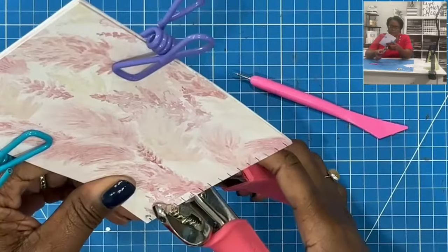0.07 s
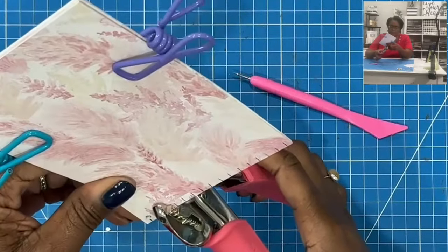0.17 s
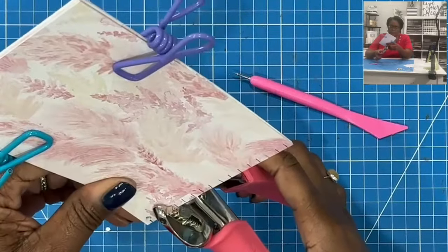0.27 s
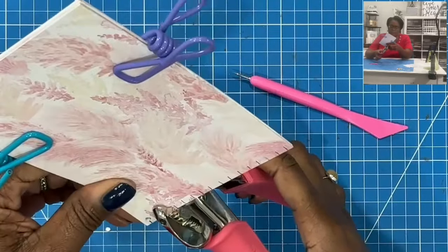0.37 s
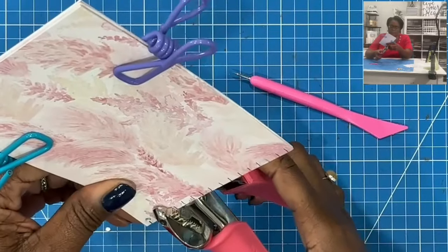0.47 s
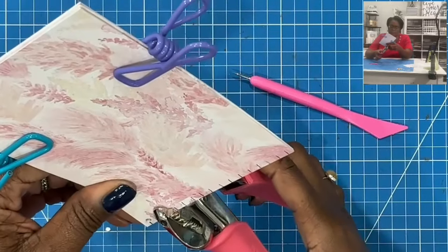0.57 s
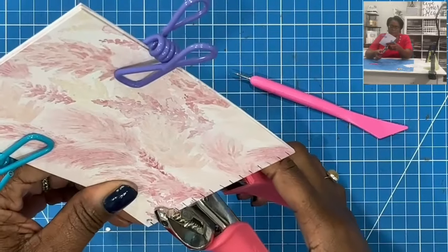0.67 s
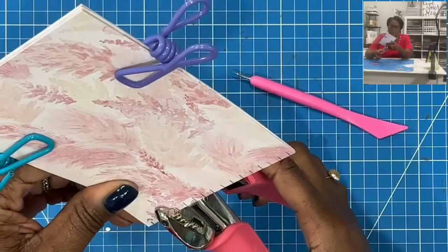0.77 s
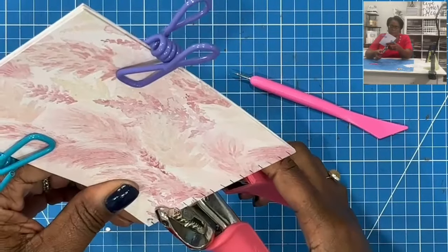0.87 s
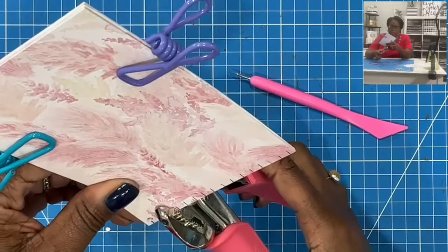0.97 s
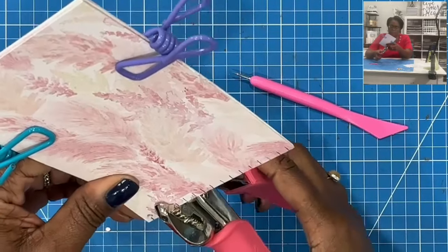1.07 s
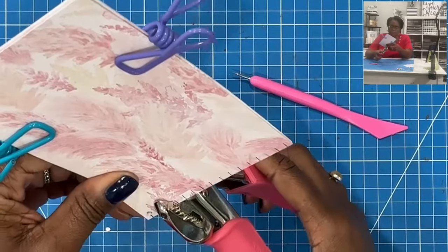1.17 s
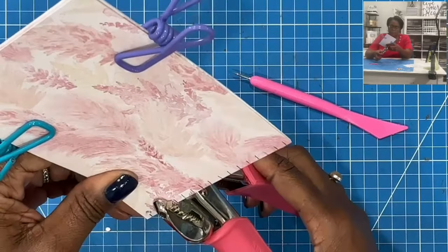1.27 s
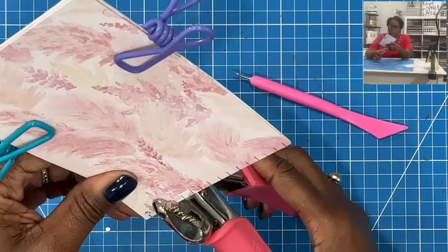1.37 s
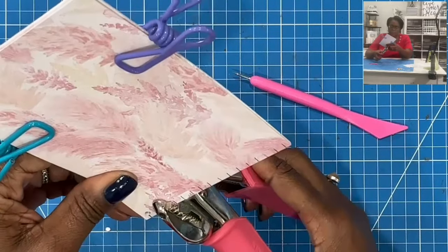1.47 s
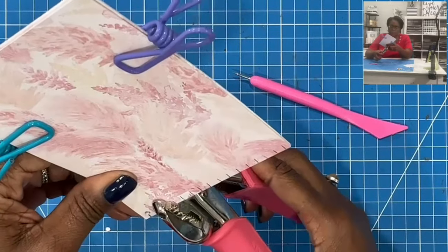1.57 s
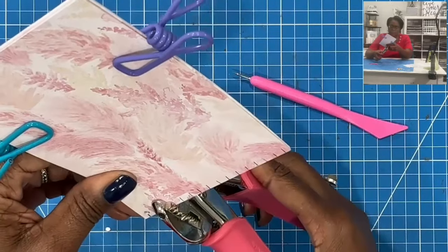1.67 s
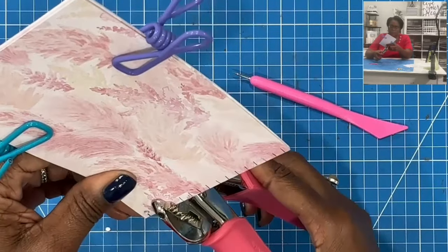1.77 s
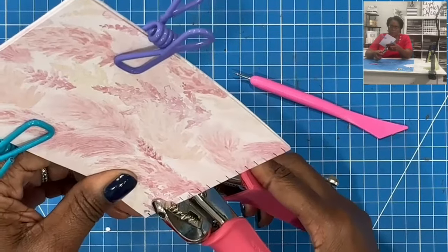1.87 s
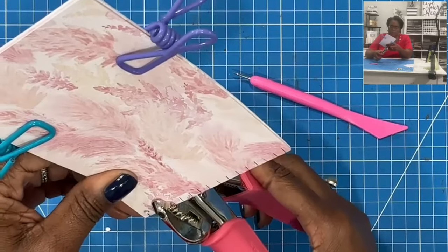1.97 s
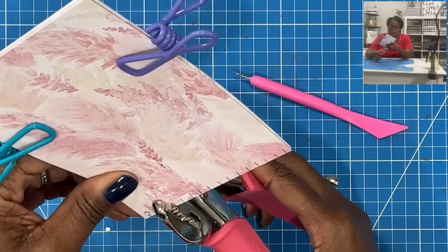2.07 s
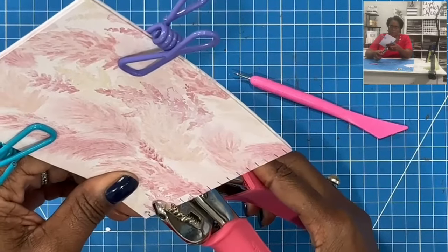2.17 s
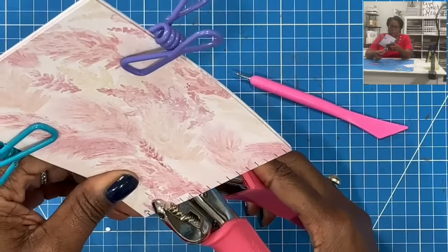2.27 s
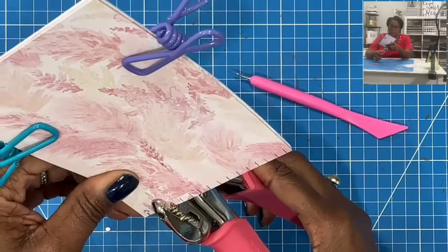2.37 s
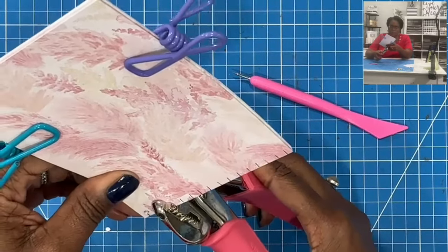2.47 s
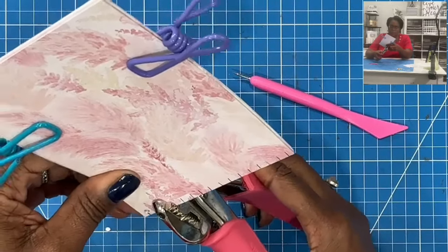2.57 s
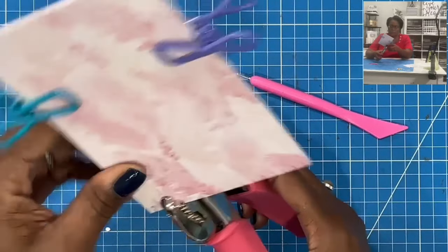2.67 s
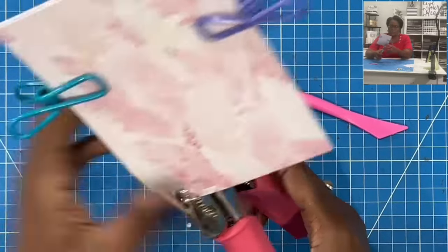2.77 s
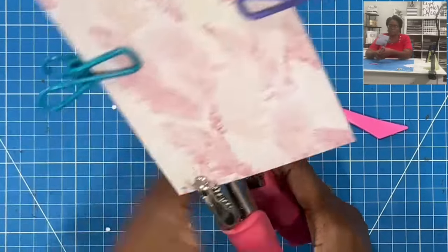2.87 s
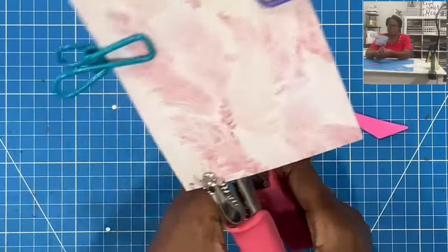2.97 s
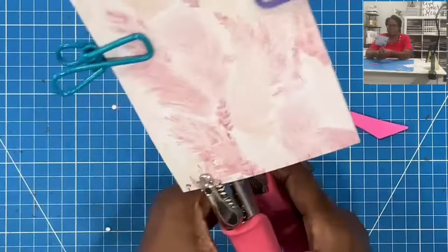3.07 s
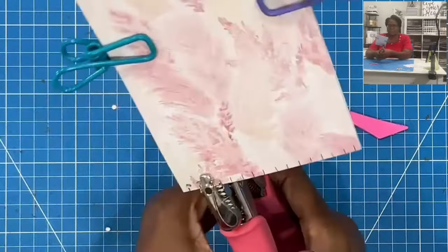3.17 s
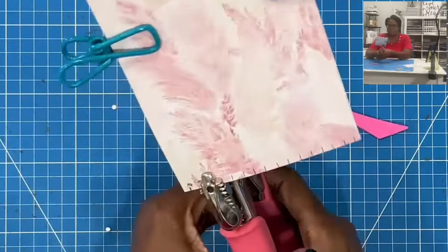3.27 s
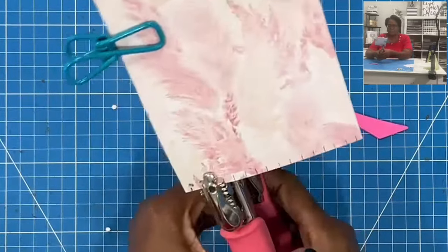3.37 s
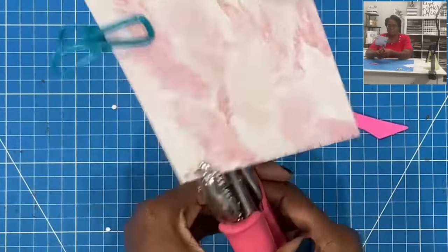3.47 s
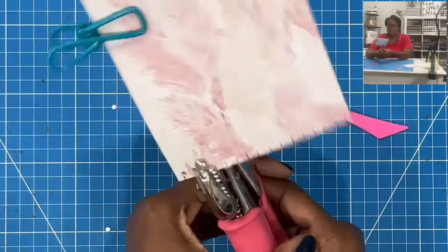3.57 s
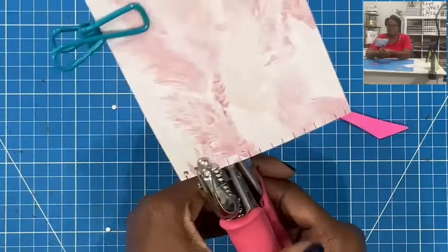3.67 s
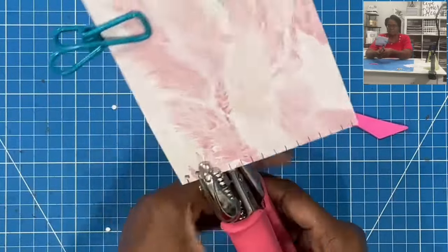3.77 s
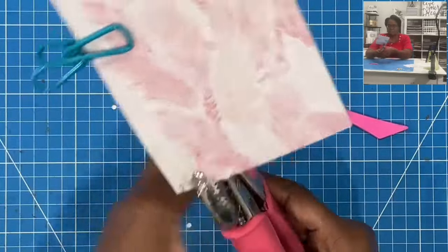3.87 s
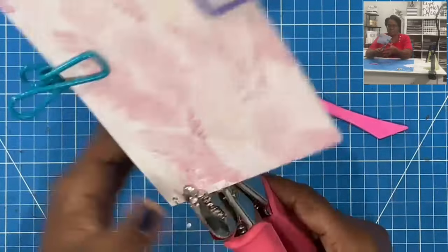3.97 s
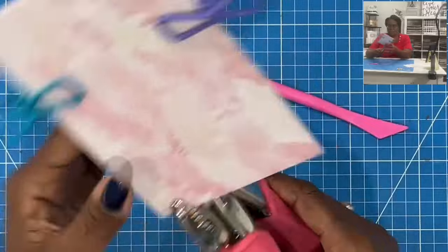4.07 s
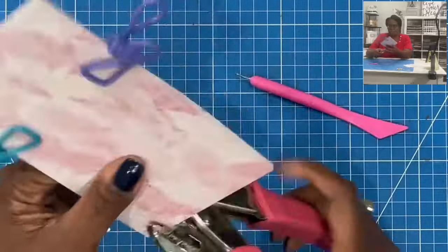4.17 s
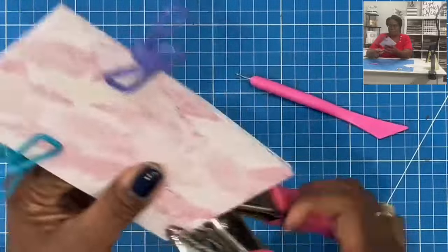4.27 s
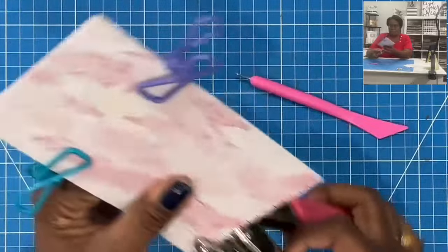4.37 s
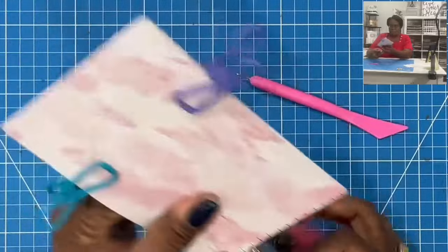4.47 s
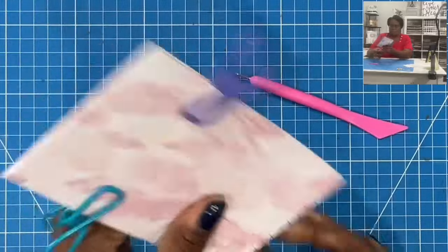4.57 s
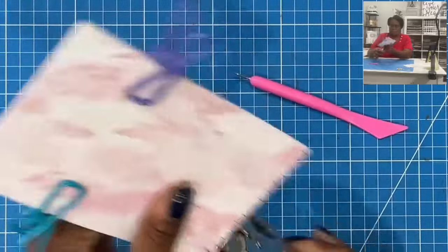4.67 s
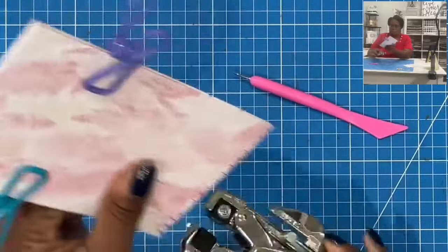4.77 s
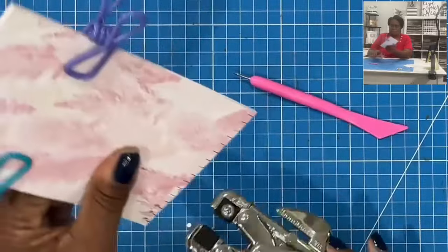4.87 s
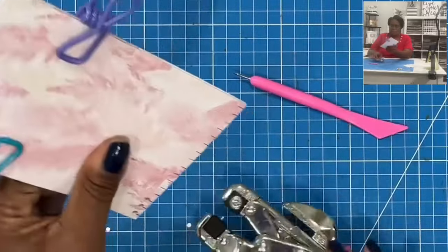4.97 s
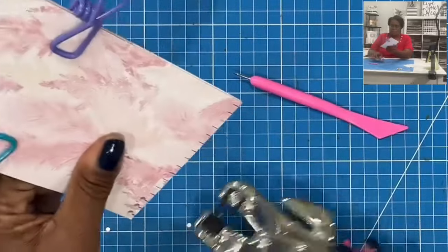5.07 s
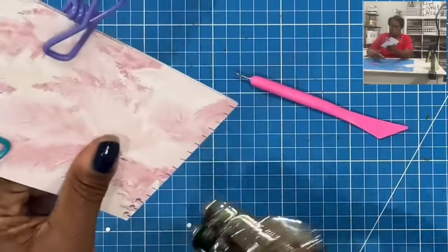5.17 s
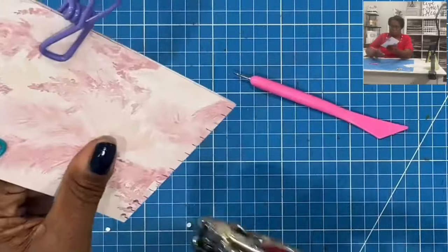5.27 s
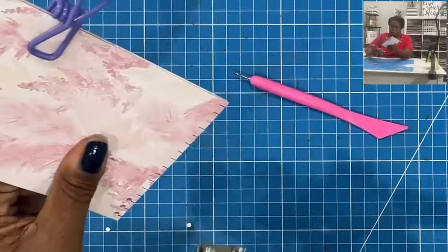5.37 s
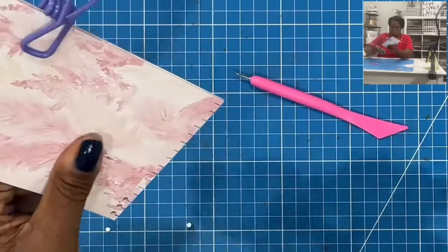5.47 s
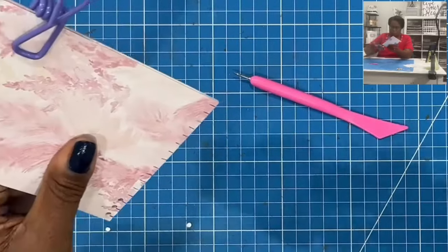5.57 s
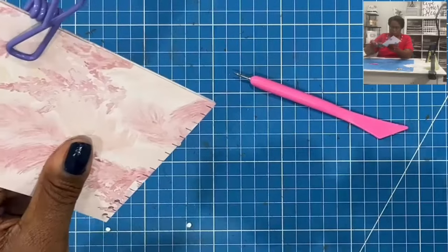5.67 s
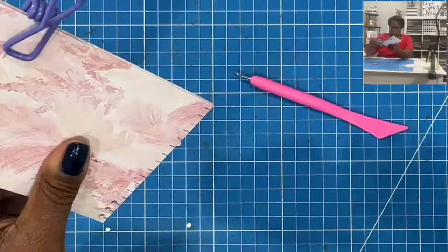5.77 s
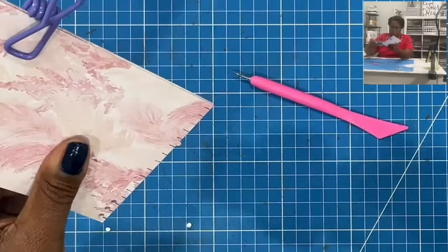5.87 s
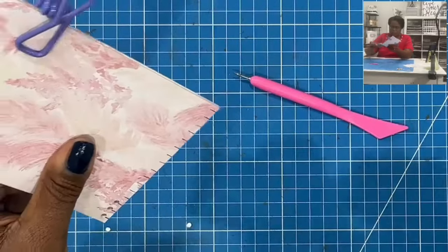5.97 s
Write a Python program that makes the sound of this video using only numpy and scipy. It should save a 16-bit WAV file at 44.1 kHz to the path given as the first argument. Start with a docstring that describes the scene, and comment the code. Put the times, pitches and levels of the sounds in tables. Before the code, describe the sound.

A fan hums quietly in a small room, with a thin whine that comes and goes. Fingers tap faintly, then a steel hole punch snaps once, loudly, through a stack of paper and rings briefly. The pin rubs back out with a tiny squeak and the paper rustles free. Finally the punch is laid on the table with light knocks, rattling parts and a small clink, all heard close up.

```python
"""A fan hums quietly in a small room, its thin whine coming and going. Fingers tap and tighten
on a steel hole punch, which snaps through a stack of paper and sets its frame ringing.
The pin rubs back out with a tiny squeak, and the paper slides free. Last, the punch is laid
on the table: it knocks, its loose parts rattle and a small lever clinks."""
import sys
import numpy as np
from scipy import signal
from scipy.fft import rfft, irfft
from scipy.io import wavfile

SR = 44100
rng = np.random.default_rng(int(sys.argv[2]) if len(sys.argv) > 2 else 0)


def output_pcm(signal):
    """Save a mono or channel-first signal as 16-bit PCM at the path in sys.argv[1].

    Samples are clipped to [-1, 1] before scaling.
    """
    pcm = np.clip(np.atleast_2d(signal).T, -1, 1) * 32767
    wavfile.write(sys.argv[1], SR, np.round(pcm).astype(np.int16))


N = 265658
TIME = np.arange(N) / SR

# Levels in the tables are relative. A ring time is how long a sound takes to fall by 60 dB.
# tone colour of the moving air: (frequency [Hz], level [dB])
AIR_COLOUR = [(25, -39), (40, -20.5), (57, 0.5), (105, -3), (150, -11), (200, -13), (270, -9), (450, -14.5),
              (800, -13.5), (1150, -17), (1600, -19), (2800, -25.5), (4200, -38.5), (7000, -38),
              (10200, -34.5), (15500, -42.5)]
# the fan's low notes: (frequency [Hz], level [dB], waver [Hz])
FAN_NOTES = [(101.8, -60, 5), (320.2, -56, 3)]
# the fan's speed wanders slowly: (time [s], pitch of its whine [Hz])
WHINE_PITCH = [(0, 1114), (.42, 1107), (1.25, 1079), (2.15, 1108), (2.65, 1114), (3.5, 1095), (4.27, 1109),
               (5.1, 1094), (6, 1110)]
# fingers shift on the paper and grips, and a hand touches the table (last row): (time [s], level [dB], dying
# time [s], upper edge [Hz])
FINGER_TAPS = [(1.199, -42, 0.014, 2600), (1.707, -54.5, 0.019, 5800), (4.039, -43, 0.027, 5550),
               (4.575, -36.5, 0.082, 298)]
# tone colour of a tap: (frequency [Hz], level [dB])
TAP_COLOUR = [(100, -11), (500, 11), (1000, -1), (1500, 6), (2100, 3), (2750, 1), (4200, -5), (5400, -2),
              (6500, -7), (11000, -7), (16000, -25)]
# notes of the grip: (frequency [Hz], level [dB], ring time [s])
GRIP_NOTES = [(2600, 0, .02), (2950, -2, .015), (3550, -6, .015)]
# paper slides over fingers and steel: (time of peak [s], level [dB], length [s])
PAPER_STROKES = [(2.71, -67, .45), (3.85, -63, .22), (4.29, -54, 0.62), (4.465, -53, 0.44),
                 (4.619, -54, 0.58), (5.25, -59, .18), (5.425, -59, .3)]
# tone colour of sliding paper: (frequency [Hz], level [dB])
RUSTLE_COLOUR = [(300, -9), (2000, 0.5), (4000, -4.5), (6500, -8), (8000, -9), (9500, -3.5), (11500, -6.5),
                 (13000, -19), (16000, -18.5)]
# the stack gives way in steps: (time [s], crack [dB], stack thump [dB], handle clack [dB])
SNAP_STEPS = [(3.5145, -15, -30.5, -14.5), (3.519, -17, -22.5, -18), (3.5235, -9, -21, -24),
              (3.529, -6.5, -13, -22.5), (3.5344, -6.5, -28, -24)]
# tone colour of a crack: (frequency [Hz], level [dB])
CRACK_COLOUR = [(100, -48), (250, -5.5), (420, -7), (650, -2), (830, -5), (1050, 0.5), (1800, 2), (2700, 1),
                (4500, 0.5), (6500, -4), (8200, -3), (10000, 4), (13000, -1.5), (14200, -6.5), (16000, -6)]
# notes of the flexing paper and hand: (frequency [Hz], level [dB], ring time [s])
STACK_NOTES = [(264.8, -1.5, 0.13), (312, -1, .05), (351, -2, 0.079), (531, -6, 0.057), (680, -9, .03)]
# notes of the handles: (frequency [Hz], level [dB], ring time [s])
HANDLE_NOTES = [(1052, 5.5, 0.089), (1101, -0.5, .05), (1325, 2.5, 0.046), (1433, -3, 0.04),
                (2386, -2.5, .04), (2700, 2, 0.046), (2860, -9, .04)]
# notes of the steel frame: (frequency [Hz], level [dB], ring time [s])
FRAME_NOTES = [(1035, -2, .22), (1088, -4, .22), (1307, 1, .24), (1374, -2, .22), (2083, -4, .24),
               (2275, 0, .22), (2638, 2, .24), (3305, -2, .22), (3371, 1, .22), (3584, -1, .22),
               (4196, -3, .24), (4962, -4, .24), (5191, -3, .22), (5840, -4, .2), (7028, -6, .2),
               (7361, -2, .2), (8630, -6, .2), (9038, -1, .2), (9714, -2, .18), (9870, 0, .18),
               (10315, -2, .2), (10492, -2, .2), (11000, -4, .18), (12800, -4, .18)]
# tone colour of the rubbing pin: (frequency [Hz], level [dB])
SCRAPE_COLOUR = [(200, -6), (1200, -1), (2500, -6), (3700, 1.5), (6000, -2.5), (8000, 0), (10500, 3),
                 (13000, -3.5), (15800, -5)]
# the punch lands on one edge and rocks onto another: (time [s], gap [s], first knock [dB],
# second knock [dB], first pitch [factor], second pitch [factor], rattle [dB], rattle's upper edge [Hz])
PUNCH_LANDINGS = [(5.456, .025, -30.5, -44.5, 0.98, .6, -45, 11000),
                  (5.552, .016, -43, -35, 1.1, 1.15, -34, 6200),
                  (5.7758, .008, -34, -38, 1.02, 1.28, -36.5, 7600),
                  (5.812, .02, -39, -49, 1.04, 1.2, -38, 14000),
                  (5.8748, .0074, -33.5, -36, 1.02, 1.2, -31, 13600),
                  (6.0155, .012, -36, -42, 1.11, 1.1, -39, 6500)]
# notes of a knock on the table, at pitch factor 1: (frequency [Hz], level [dB], ring time [s])
TABLE_NOTES = [(590, -11, 0.039), (1074, 6, 0.063), (1213, 5.5, 0.036), (1395, 1, 0.026), (1770, -6, 0.014),
               (2660, -5, 0.045), (3310, -19, 0.031), (4200, -14, 0.046)]
# tone colour of loose steel parts: (frequency [Hz], level [dB])
RATTLE_COLOUR = [(200, -15), (1200, -5), (3000, -5.5), (4200, -14), (5300, -4), (6500, -6), (7600, -5.5),
                 (10000, 0.5), (13000, -6), (15500, -6.5)]
# a small steel lever drops and bounces: (time [s], level [dB])
LEVER_BOUNCES = [(5.611, -46), (5.617, -37), (5.641, -39.5), (5.657, -46)]
# notes of the lever: (frequency [Hz], level [dB], ring time [s])
LEVER_NOTES = [(5600, -1, .16), (5740, -10, .14), (7700, -13, .12), (9184, -8, .14), (9502, -3, .12),
               (10680, -8, .12), (15060, 3, .15), (15170, 1, .12)]
# loose parts fall into place: (time [s], level [dB])
SETTLING_PARTS = [(5.686, -39), (5.803, -36), (5.918, -35.5), (5.952, -39.5)]
# echoes off the near walls: (frequency [Hz], level [dB])
WALL_COLOUR = [(200, -7), (600, -4), (1200, -3), (2500, 1), (16000, -0.5)]
# how long the whole room echoes: (frequency [Hz], ring time [s])
ROOM_RING = [(150, 0.259), (500, 0.31), (1200, 0.3), (3000, 0.46), (3700, 0.48), (6000, 0.37),
             (10000, 0.31), (16000, 0.23)]


def amp(db):
    """Turns decibels into a gain."""
    return 10 ** (np.asarray(db) / 20)


def evened(x):
    """Scales a signal to an average strength (rms) of 1."""
    return x / np.sqrt(np.mean(x ** 2) + 1e-20)


def read(points, hz):
    """Looks up a frequency in a table, blending between rows on a log scale."""
    row_hz, value = np.transpose(points)
    return np.interp(np.log(hz + 1), np.log(row_hz + 1), value)


def drift(rate_hz):
    """A smooth random wobble of strength 1; a higher rate wobbles faster."""
    hz = np.fft.rfftfreq(N, 1 / SR)
    return evened(irfft(rfft(rng.standard_normal(N)) * np.exp(-(hz / rate_hz) ** 2), N))


def through(x, response):
    """Filters x with a response to a single click, scaled to energy 1."""
    return signal.oaconvolve(x, response / np.linalg.norm(response))[:N]


def colour(x, points, size=8192):
    """Gives x a tone colour, using a filter that never sounds ahead of its input."""
    log_gain = np.log(amp(read(points, abs(np.fft.fftfreq(size, 1 / SR)))))
    spectrum = np.exp(np.conj(signal.hilbert(log_gain)))
    return through(x, np.fft.ifft(spectrum).real[:size // 2])


def tone(hz, waver_hz):
    """A pure note of strength 1 whose pitch wavers."""
    return np.sqrt(2) * np.sin(2 * np.pi * np.cumsum(hz + waver_hz * drift(rate_hz=12)) / SR)


def add(mix, s, sound):
    """Mixes a sound in at s seconds."""
    part = mix[round(s * SR):][:len(sound)]
    part += sound[:len(part)]


def blow(db, dying_s, grit, edge_hz=None):
    """A sharp click plus a dying burst of noise; grit is the noise's share, from 0 to 1."""
    fade = np.exp(-TIME[:SR // 8] / dying_s)
    burst = rng.standard_normal(len(fade)) * fade
    burst *= np.sqrt(grit) / np.linalg.norm(burst)
    burst[0] += np.sqrt(1 - grit)
    if edge_hz:
        burst = signal.lfilter(*signal.butter(4, edge_hz, fs=SR), burst)
    return amp(db) * np.linalg.norm(fade) * burst


def ring(notes, pitch=1):
    """The dying notes of a struck object, scaled to energy 1."""
    t = TIME[:SR // 3]
    response = sum((-1) ** k * amp(db - 60 * t / ring_s) * np.sin(2 * np.pi * hz * pitch * t)
                   for k, (hz, db, ring_s) in enumerate(notes))
    return response / np.linalg.norm(response)


def knock(db, notes, pitch=1, brightening_db=16):
    """A clean hit; a stiffer spot (pitch above 1) rings higher and favours the upper notes."""
    db_per_octave = brightening_db * (pitch - 1)
    tilted = [(hz, note_db + db_per_octave * np.log2(hz), ring_s) for hz, note_db, ring_s in notes]
    return amp(db) * np.sqrt(.003 * SR) * ring(tilted, pitch)


def stroke(peak_s, rise_s, hold_s, fall_s):
    """A swell: climbs 30 dB per rise time up to its peak, holds, then drops 30 dB per fall time."""
    before = np.maximum((peak_s - TIME) / rise_s, 0)
    after = np.maximum((TIME - peak_s - hold_s) / fall_s, 0)
    return amp(-30 * (before + after))


def friction():
    """Noise clumped into fine grains as fibres catch and let go."""
    return evened(rng.standard_normal(N) * amp(2.5 * drift(rate_hz=900)))


def fan(air_db=-50, whine_db=-56.3, duct_hz=1110.5, duct_width_hz=10):
    """Moving air, two low notes and a whine that swells when its pitch meets the duct's own note."""
    sway_db = .25 * drift(rate_hz=4)
    air = colour(rng.standard_normal(N), AIR_COLOUR) * amp(air_db + sway_db)
    hum = sum(amp(db) * tone(hz, waver_hz) for hz, db, waver_hz in FAN_NOTES)
    blade_hz = np.interp(TIME, *np.transpose(WHINE_PITCH))
    swell = 1 / np.hypot(1, 2 * (blade_hz - duct_hz) / duct_width_hz)
    return air + hum + amp(whine_db) * swell * tone(blade_hz, waver_hz=1)


def finger_taps():
    """Each soft touch of a finger makes a dull puff of noise."""
    taps = np.zeros(N)
    for s, db, dying_s, edge_hz in FINGER_TAPS:
        add(taps, s, blow(db, dying_s, grit=1, edge_hz=edge_hz))
    return colour(taps, TAP_COLOUR)


def grip_creak():
    """The grip crunches faintly as the hand tightens on it."""
    slips = np.zeros(N)
    add(slips, s=1.199, sound=blow(db=-51.5, dying_s=.02, grit=.9))
    return through(slips, ring(GRIP_NOTES))


def paper_slide(rise_share=.42):
    """Sliding paper rustles, growing louder as each stroke gathers speed, then fading."""
    strokes = [amp(db) * stroke(s, rise_share * length, 0, (1 - rise_share) * length)
               for s, db, length in PAPER_STROKES]
    return np.linalg.norm(strokes, axis=0) * colour(friction(), RUSTLE_COLOUR)


def paper_snap():
    """The sheets are cut in steps; each step cracks, thumps the stack and jolts the handles."""
    cracks, knocks = np.zeros((2, N))
    for s, crack_db, thump_db, clack_db in SNAP_STEPS:
        add(cracks, s, blow(crack_db - 1.5, dying_s=.0064, grit=1))
        add(knocks, s, knock(thump_db - 1.5, STACK_NOTES))
        add(knocks, s, knock(clack_db + 1, HANDLE_NOTES))
    return colour(cracks, CRACK_COLOUR) + knocks


def steel_ring(pin_stop_s=3.5238, pin_stop_db=14.9):
    """The frame rings when the pin hits its stop and at each landing; the lever rings as it bounces."""
    ringing = np.zeros(N)
    add(ringing, pin_stop_s, amp(pin_stop_db) * ring(FRAME_NOTES))
    for s, gap, *_, rattle_db, _ in PUNCH_LANDINGS:
        add(ringing, s + gap, knock(rattle_db - 7, FRAME_NOTES))
    for s, db in LEVER_BOUNCES:
        add(ringing, s, knock(db + 6, LEVER_NOTES))
    return ringing


def pin_scrape(start_s=4.155, db=-40):
    """The pin breaks loose and rubs out through the paper."""
    rub = (TIME > start_s) * stroke(peak_s=4.178, rise_s=.065, hold_s=.015, fall_s=.1)
    return amp(db) * rub * colour(friction(), SCRAPE_COLOUR)


def pin_squeak(peak_s=4.248, rise_s=.048, db=-39.5, top_hz=7810, sag_hz=65):
    """The pin sings briefly in its steel guide, higher as it grips harder; the guide rings on."""
    grip = stroke(peak_s, rise_s, hold_s=.024, fall_s=.016)
    guide = amp(-14) * stroke(peak_s, rise_s, hold_s=.063, fall_s=.1)
    hz = top_hz - sag_hz * (1 - grip) + 22 * drift(rate_hz=120)
    phase = 2 * np.pi * np.cumsum(hz) / SR
    note = np.sin(phase) + amp(-14) * np.sin(2 * phase)
    return amp(db) * np.maximum(grip, guide) * note


def set_down():
    """The punch knocks twice at each landing and shakes its loose parts, which bounce and settle."""
    knocks, rattles = np.zeros((2, N))
    for s, gap, first_db, second_db, first_pitch, second_pitch, rattle_db, edge_hz in PUNCH_LANDINGS:
        for at, knock_db, pitch in (s, first_db, first_pitch), (s + gap, second_db, second_pitch):
            add(knocks, at, knock(knock_db + 2, TABLE_NOTES, pitch))
            softer_db = max(first_db, second_db) - knock_db  # the softer knock rattles less
            add(rattles, at, blow(rattle_db - .7 * softer_db, dying_s=.016, grit=.92, edge_hz=edge_hz))
    for s, db in LEVER_BOUNCES + SETTLING_PARTS:
        add(rattles, s, blow(db, dying_s=.014, grit=.92))
    return knocks + amp(-.5) * colour(rattles, RATTLE_COLOUR)


def room(x, early_db, early_ring_s, late_db, size=512, hop=64, delay_hops=4):
    """Adds a wash of echoes that dies fast off the near walls and more slowly in the whole room."""
    frames = dict(fs=SR, nperseg=size, noverlap=size - hop)
    hz, t, direct = signal.stft(x, **frames)
    t = t[t < .5]
    early = amp(-60 * t / early_ring_s) ** 2
    early /= early.sum()
    late = amp(-60 * t / read(ROOM_RING, hz)[:, None]) ** 2
    late /= late.sum(1, keepdims=True)
    decay = amp(early_db + read(WALL_COLOUR, hz)[:, None]) ** 2 * early + amp(late_db) ** 2 * late
    decay = np.pad(decay, ((0, 0), (delay_hops, 0)))  # the trip to the first wall and back
    power = abs(signal.fftconvolve(abs(direct) ** 2, decay, axes=1)[:, :direct.shape[1]])
    scatter = signal.stft(rng.standard_normal(N), **frames)[2]
    echoes = signal.istft(np.sqrt(power) * scatter / scatter.std(), **frames)[1]
    return x + echoes[:N]


def scene():
    """The handwork echoes in the room; ringing steel, the squeak and the fan are added on top."""
    work = finger_taps() + grip_creak() + paper_slide() + paper_snap() + pin_scrape() + set_down()
    work = room(work, early_db=-.5, early_ring_s=.14, late_db=-5)
    # cuts the low boom from the handling sounds and their echoes
    work = signal.sosfilt(signal.butter(5, 228, "highpass", fs=SR, output="sos"), work)
    return (fan() + work + steel_ring() + pin_squeak())[None]


def record(dry, ceiling=1.7, edge_hz=15830):
    """Rounds off the loudest peaks, then cuts the very highest treble."""
    rounded = ceiling * np.tanh(dry / ceiling)
    treble_cut = signal.firwin(1023, edge_hz, window=("kaiser", 9), fs=SR)
    return signal.oaconvolve(rounded, treble_cut[None], "same")


dry = scene()
out = record(dry)
output_pcm(out)
```